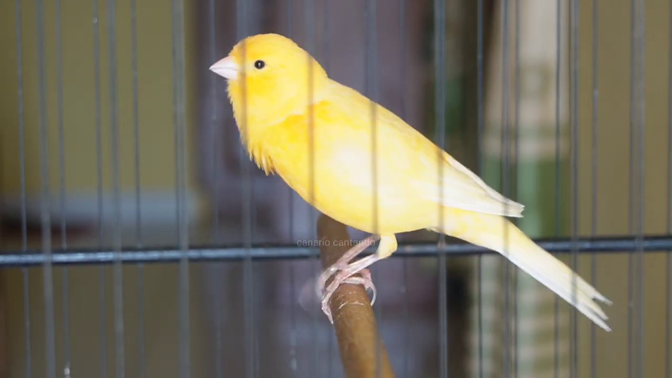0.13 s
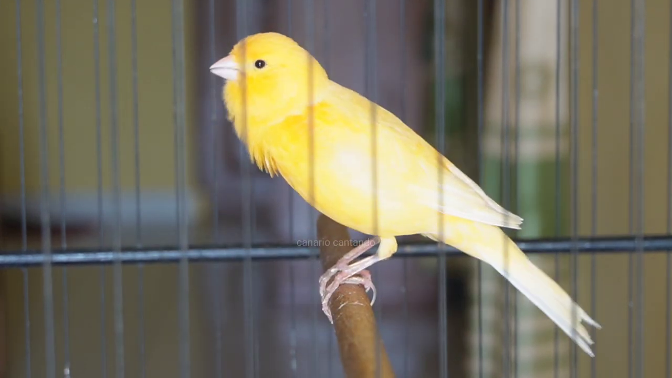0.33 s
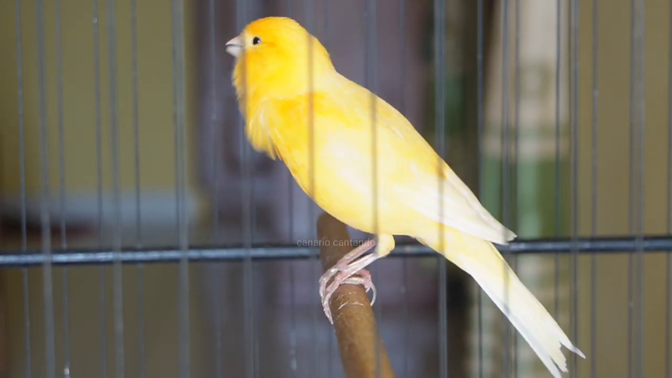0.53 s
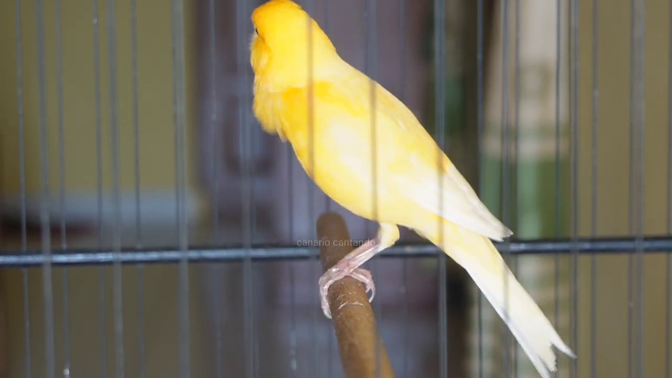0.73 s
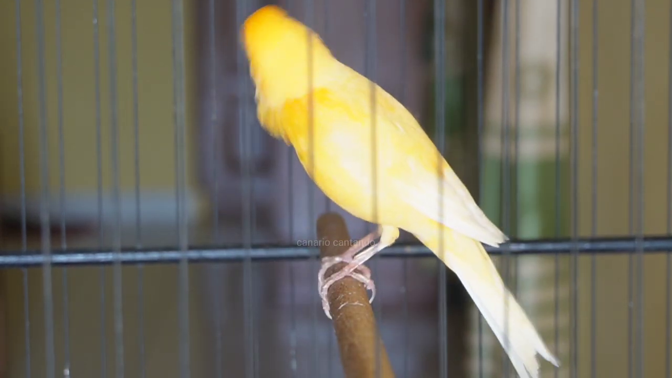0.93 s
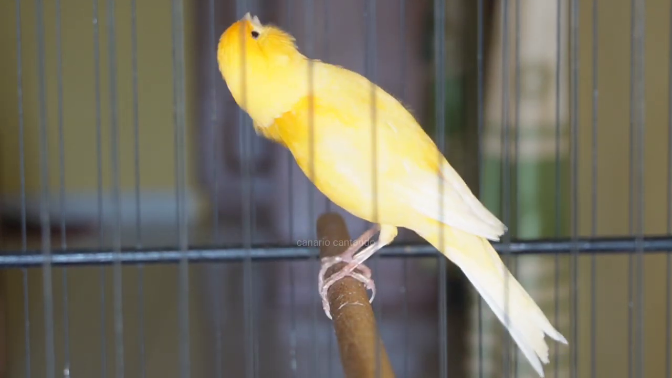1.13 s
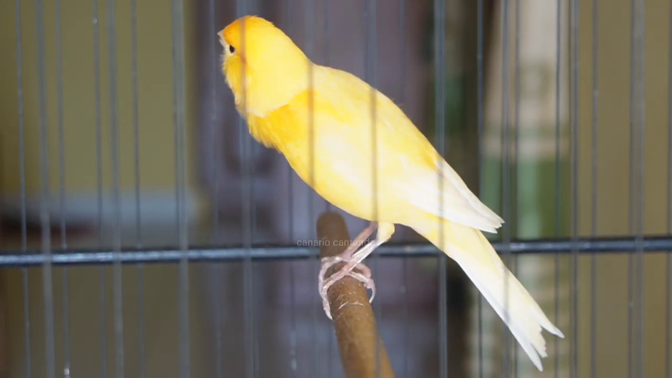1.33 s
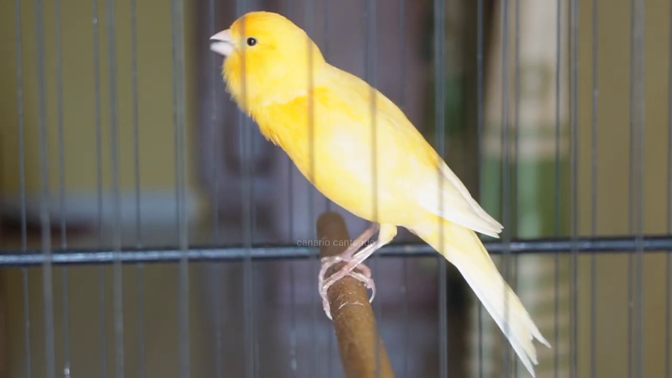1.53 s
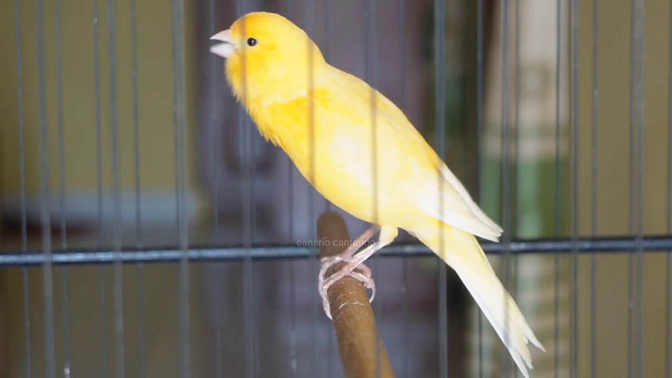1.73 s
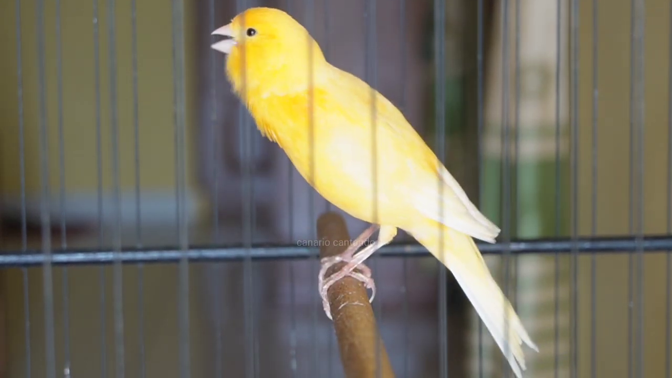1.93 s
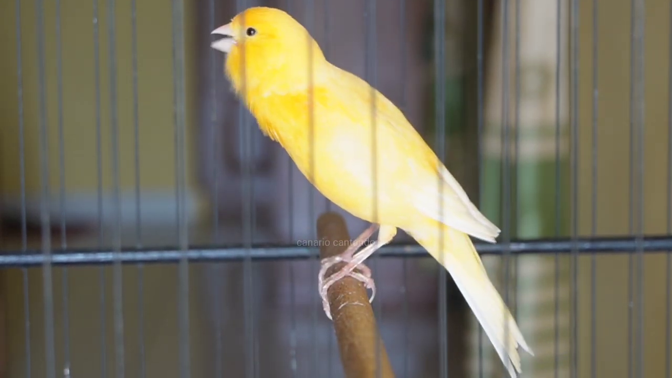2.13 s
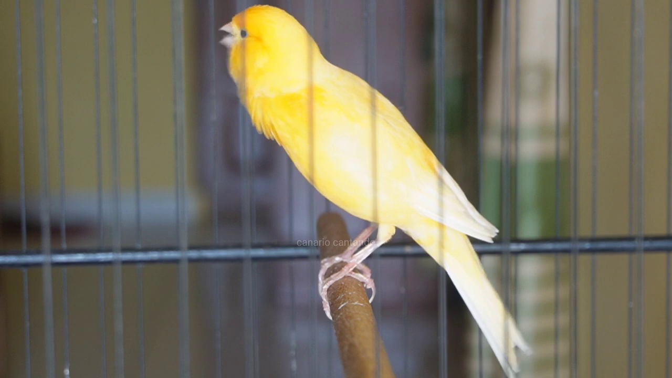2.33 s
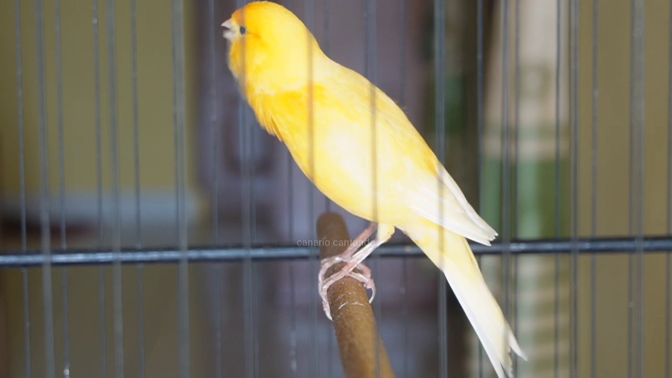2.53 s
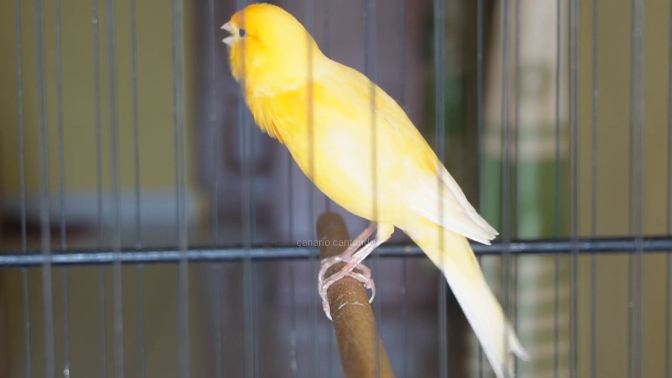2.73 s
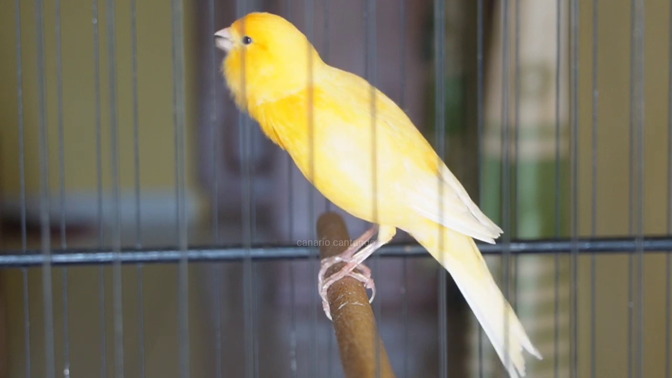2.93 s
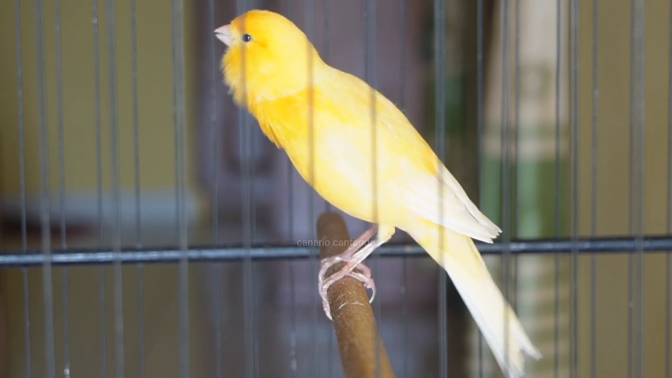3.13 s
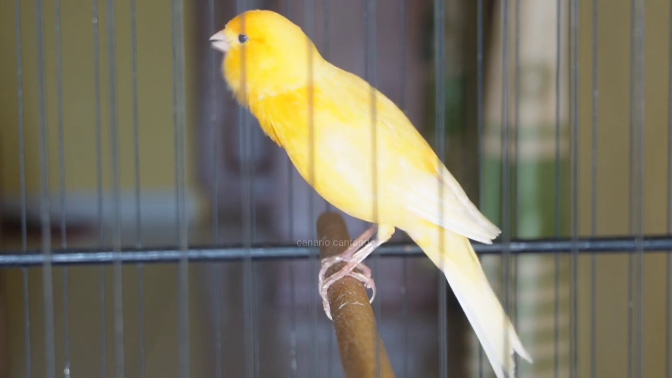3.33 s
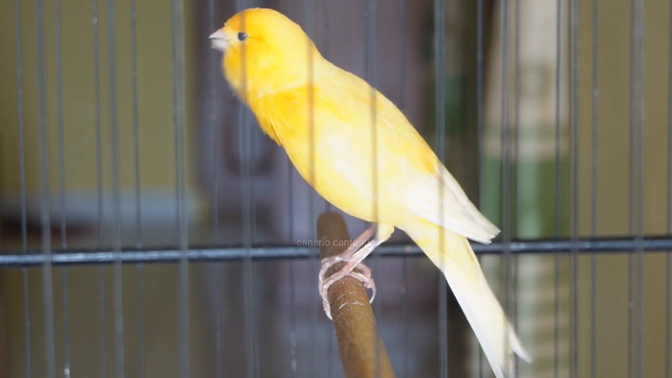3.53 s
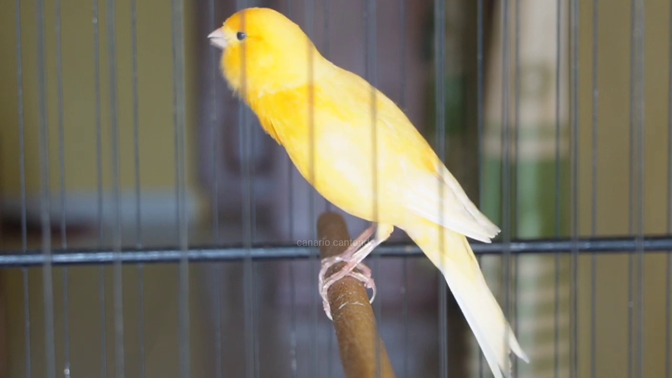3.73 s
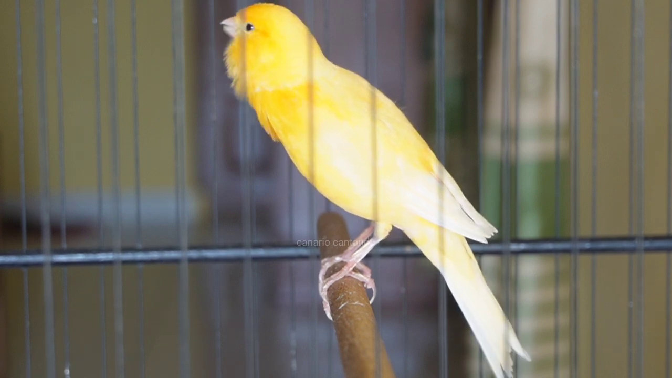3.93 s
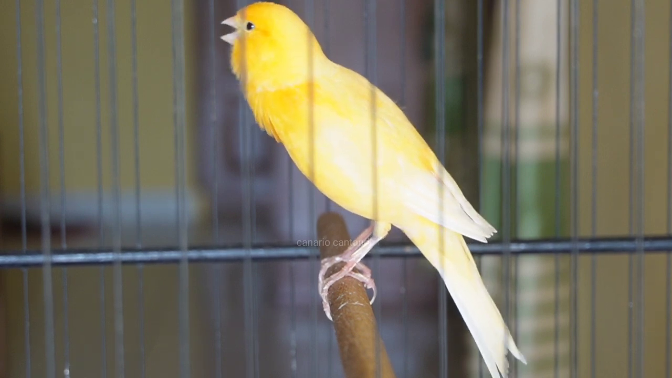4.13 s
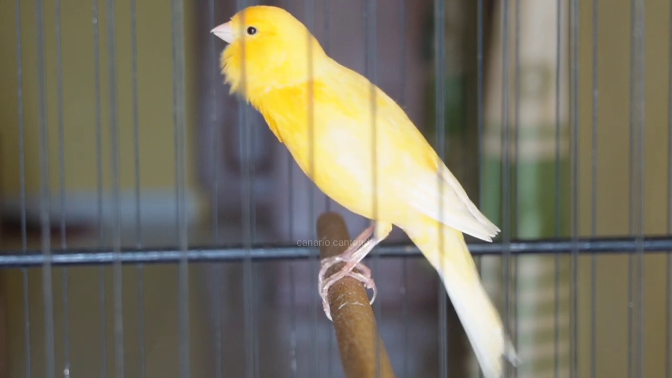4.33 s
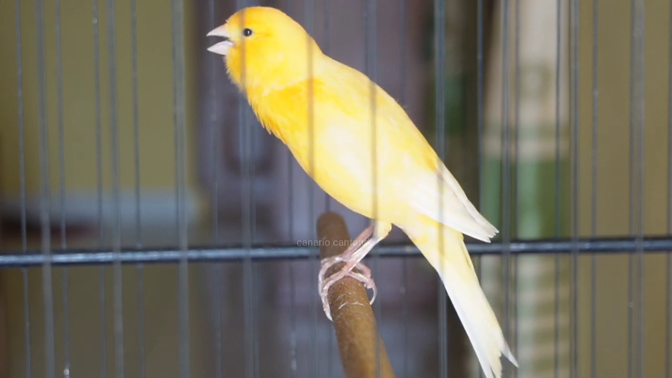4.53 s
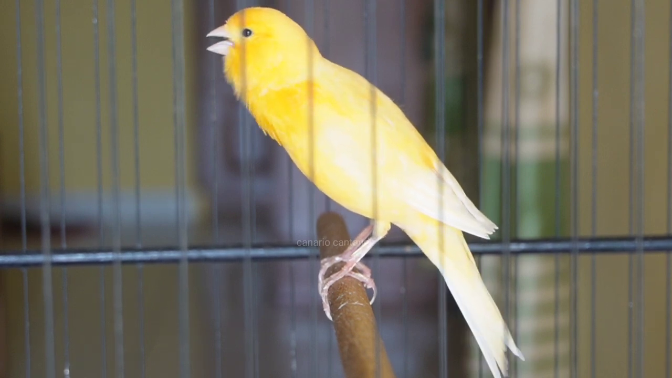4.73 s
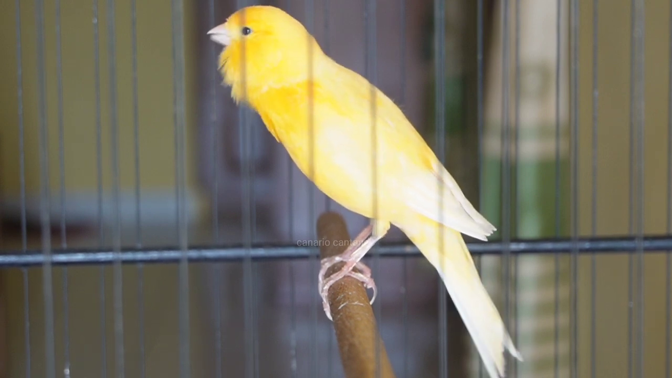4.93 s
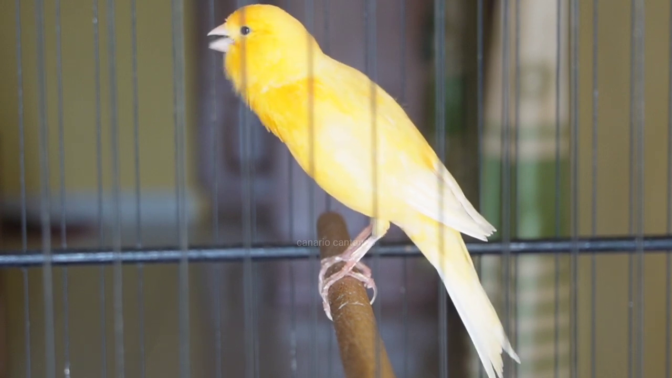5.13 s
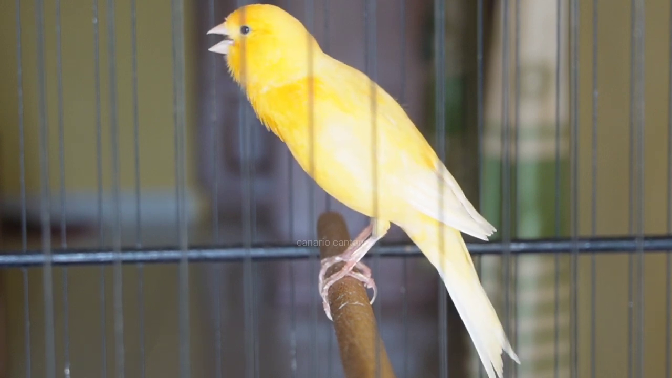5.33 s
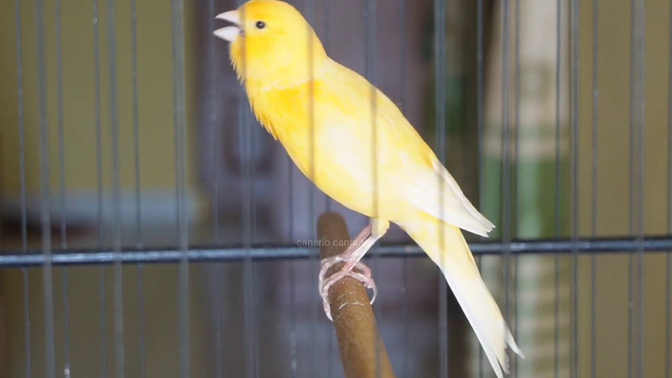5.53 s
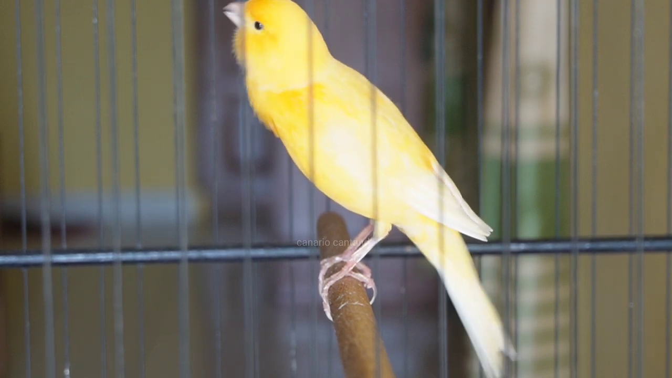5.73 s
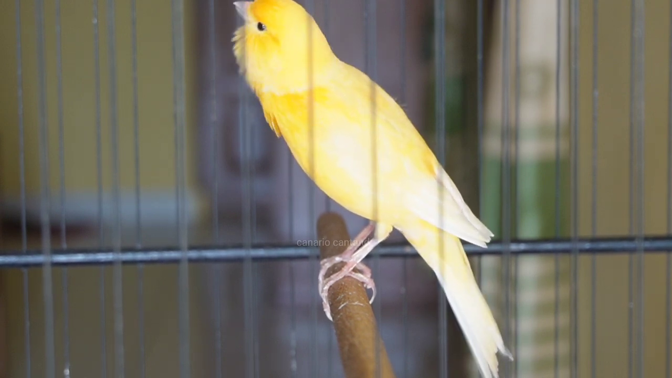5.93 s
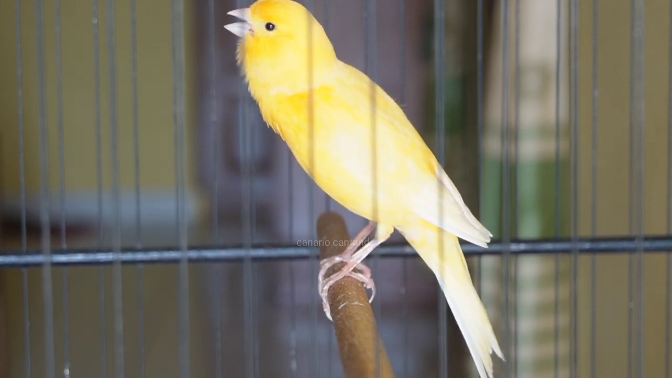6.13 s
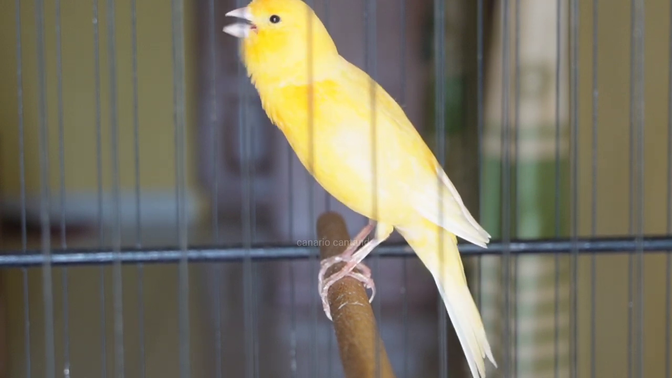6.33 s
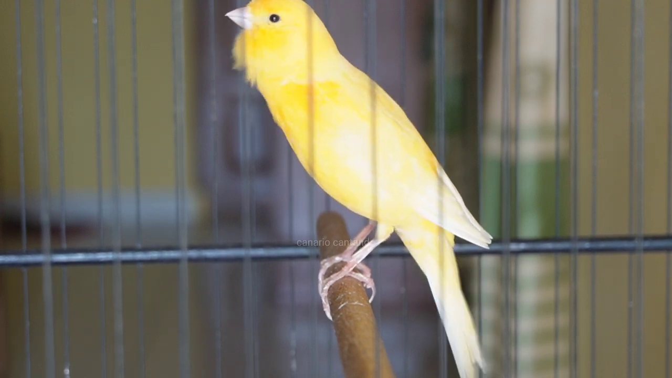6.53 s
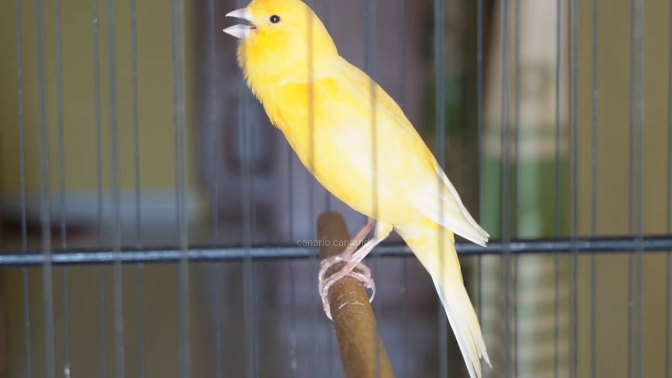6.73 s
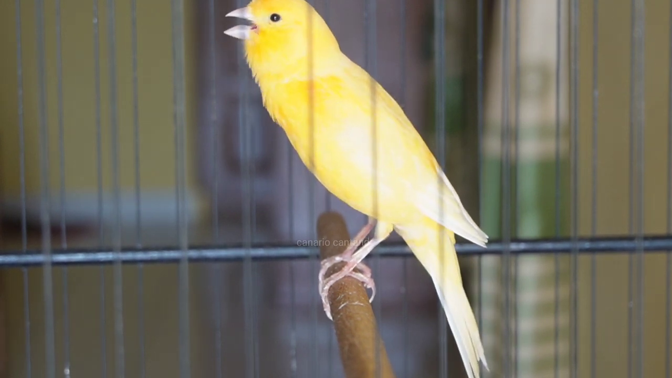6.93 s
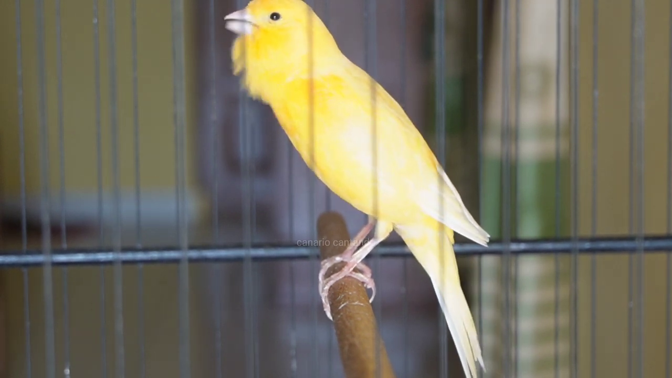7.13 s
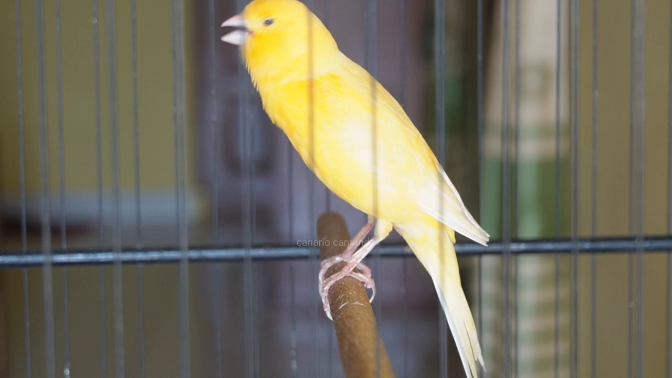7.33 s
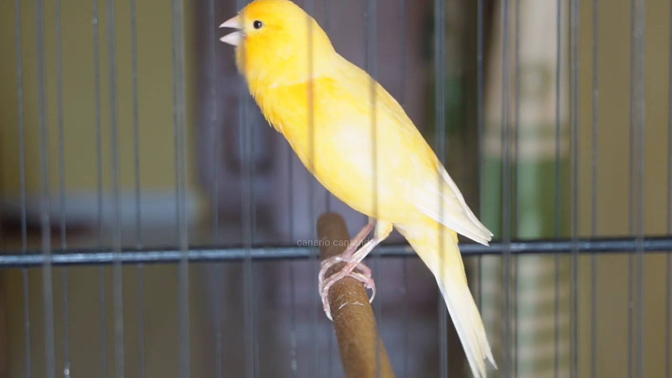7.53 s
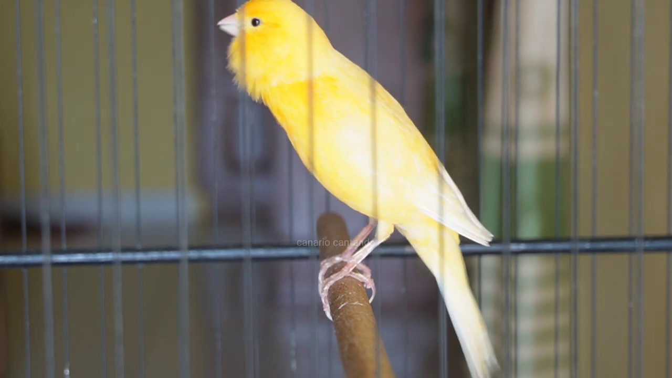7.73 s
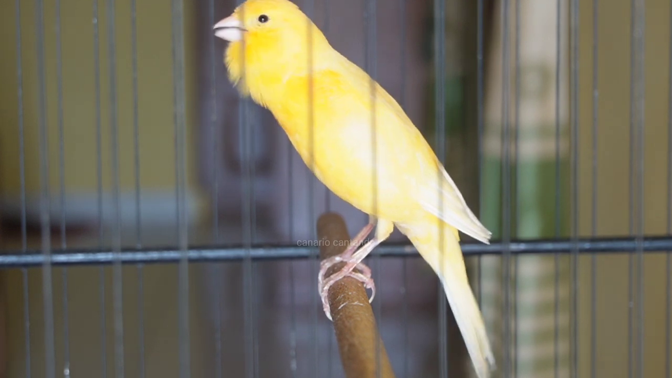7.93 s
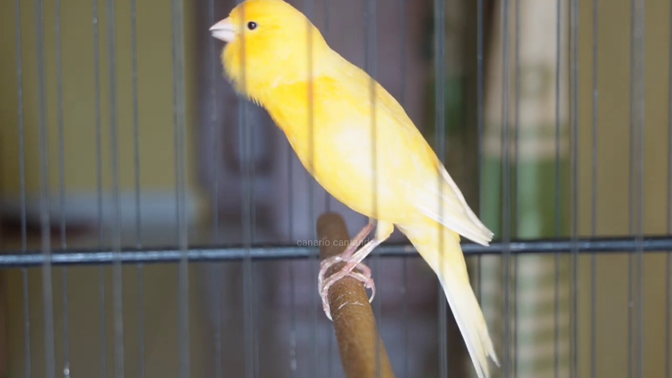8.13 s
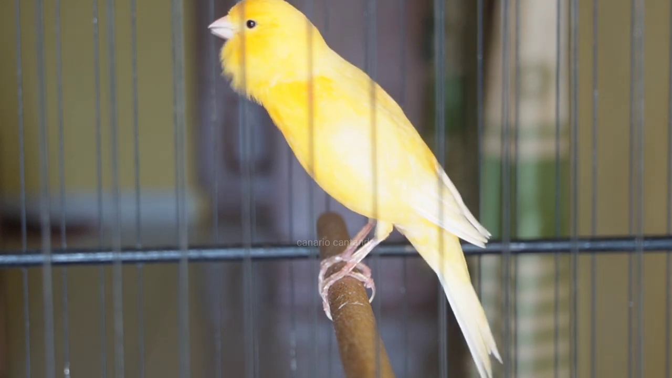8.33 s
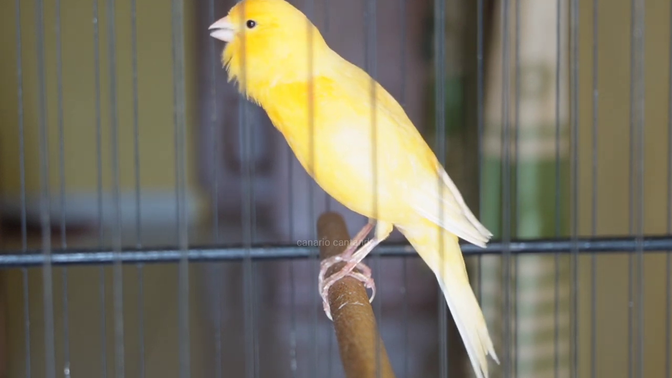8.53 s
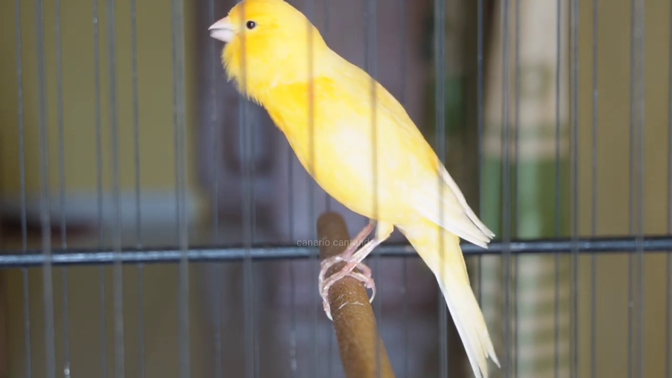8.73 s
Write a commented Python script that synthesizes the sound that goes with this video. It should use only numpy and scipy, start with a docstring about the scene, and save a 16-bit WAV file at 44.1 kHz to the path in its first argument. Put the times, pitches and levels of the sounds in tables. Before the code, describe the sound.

Close canary song of rapid chips, rolls, slowing falling whistles and a final loud trill, over a faint low rumble and hiss.

```python
"""In a small room, a caged canary sings close to the microphone, over a low rumble and thin hiss.
Quick downward sweeps slow into long falling whistles; two rising whistles lead into a fast, loud trill.
Each syllable is a nearly pure tone whose pitch follows membrane tension in the syrinx and whose level
is shaped by throat and beak. Near reflections, a wall echo and a short reverberation follow it.
Early in the song a faint, distant tone swells and fades."""
import sys
import numpy as np
from scipy import signal
from scipy.fft import rfft, irfft
from scipy.io import wavfile
from scipy.ndimage import uniform_filter1d, minimum_filter1d, map_coordinates

SR = 44100
rng = np.random.default_rng(int(sys.argv[2]) if len(sys.argv) > 2 else 0)


def log_audio(samples):
    """Write samples as a 16-bit WAV file to the path given in sys.argv[1]."""
    # one column per channel
    frames = np.atleast_2d(samples).T
    # limit to full scale, then quantise
    limited = np.clip(frames, -1, 1)
    pcm = np.round(limited * 32767).astype(np.int16)
    wavfile.write(sys.argv[1], SR, pcm)


N = 392049
TIME = np.arange(N) / SR

# spectrum of the background noise: (frequency [Hz], relative density [dB])
NOISE_SPECTRUM = [(25, -18), (45, -9), (70, -3), (110, -2), (170, 0), (280, -5), (500, -9), (1000, -11),
                  (2000, -13), (4000, -15.5), (8000, -24.5), (12000, -32), (16000, -35)]
# stereo width of that noise: (frequency [Hz], side minus mid [dB])
NOISE_WIDTH = [(25, -20), (90, -17.5), (180, -11.5), (350, -6.5), (1000, -8), (12000, -1)]
# envelope of that noise: (time [s], level [dB])
NOISE_ENVELOPE = [(0, -50), (4, -49), (7.7, -49), (8.2, -50.5), (8.9, -53)]
# course of the distant tone: (time [s], pitch [Hz], level [dB])
DISTANT_TONE = [(1.7, 983, -72), (1.85, 965, -64), (1.97, 950, -52.5), (2.12, 937, -53), (2.3, 947, -54.5),
                (2.6, 940, -74)]

# spectrum of the reverberation: (frequency [Hz], gain [dB])
REVERB_SPECTRUM = [(2000, -8), (2800, -9.5), (3600, -8), (4500, -5), (5500, -4.5), (6500, -2), (9000, -3),
                   (15000, 1.5)]
# reverberation time: (frequency [Hz], time to fall by 60 dB [s])
REVERB_TIME = [(2000, 0.56), (4000, 0.42), (7000, 0.3), (15000, 0.13)]
# hard surfaces near the perch: (delay [s], gain [dB])
NEAR_REFLECTIONS = [(0.00063, -20), (0.00138, -19), (0.00143, -11), (0.00145, -13), (0.00283, -24),
                    (0.00878, -20), (0.00916, -24)]
# one wall returns mostly the low end of a sweep, as a second pip: (frequency [Hz], gain [dB])
WALL_RESPONSE = [(2000, -17.5), (2700, -10), (3100, -13.5), (3700, -19.5), (6000, -38)]
# where the beak points: (time [s], left minus right [dB])
BEAK_DIRECTION = [(0, -.4), (7.3, -.4), (7.9, -1.3)]

# how well throat and beak radiate the tone: (frequency [Hz], gain [dB])
TRACT_RESPONSE = [(1500, -32), (2100, -16.5), (2800, -1.5), (3500, -0.7), (4300, 0.5), (4900, -4),
                  (5500, -8), (6200, -15), (7000, -14.5), (8000, -31)]
# strength of an overtone against the fundamental: (overtone frequency [Hz], relative level [dB])
OVERTONE_SPECTRUM = [(4000, -41), (6000, -48), (7500, -46.5), (8200, -45.5), (9500, -33.5), (11000, -37),
                     (12500, -47), (15000, -34.5)]
# offset of each harmonic from that spectrum: (multiple of the pitch [1], offset [dB])
HARMONIC_OFFSETS = [(2, 2.5), (3, -8.5), (4, -15)]
# the repertoire, by gesture name: (share of the note [1], pitch [Hz], relative pressure [dB])
SONG_GESTURES = { "pip": [(0, 4600, -2), (.3, 3950, -14), (.6, 3170, -2.5), (.85, 3120, -1.5),
                 (1, 2580, -3)], "tick": [(0, 6330, 6), (.3, 4760, -6.5), (.6, 4120, -12), (.85, 3196, 0.5),
                 (1, 2700, -3)], "chit": [(0, 7150, -4), (.3, 5300, -11), (.6, 4280, -7.5),
                 (.85, 3450, -0.5), (1, 2600, -11)], "chip": [(0, 7350, -4), (.3, 5600, -14),
                 (.6, 4500, -7.5), (.85, 3620, 0.5), (1, 2990, -24)], "roll": [(0, 7010, -3.5),
                 (.3, 5270, -5.5), (.6, 3900, -1), (.85, 2860, 0), (1, 1980, -2)], "sweep": [(0, 7120, -6),
                 (.3, 5760, -0.5), (.6, 4307, 0), (.85, 3040, -2.5), (1, 1996, -8.5)],
                 "dive": [(0, 7150, -12.5), (.3, 5630, -2.5), (.6, 4233, 0), (.85, 2870, -4),
                 (1, 1555, -0.5)], "arch": [(0, 7720, -1), (.3, 6720, -3), (.6, 5420, -0.5),
                 (.85, 3520, -4), (1, 1550, -5.5)], "fall": [(0, 7720, -5.5), (.3, 6300, -3.5),
                 (.6, 4970, -0.5), (.85, 3680, -2.5), (1, 1570, -7)], "rise": [(0, 2630, -16.5),
                 (.05, 3520, -2.5), (.18, 4110, -3), (.34, 5020, -2.5), (.6, 5800, -2), (.9, 6220, 4),
                 (1, 6257, 0)], "flick": [(0, 2410, -8.5), (.27, 2910, -5), (.55, 3530, 3.5),
                 (.74, 3710, 6.5), (.87, 3800, -1), (1, 3800, -18.5)], "chirp": [(0, 1900, -5.5),
                 (.27, 3024, -1.5), (.55, 3550, 2), (.74, 3744, 6.5), (.87, 3830, 0), (1, 3770, -18)]}
# rolls and trills, each repeating one gesture: (gesture, notes [count], first end [s], last end [s],
# time added to each beat [s], first length [s], last length [s], first gain [dB], last gain [dB],
# latest entry as a share of the note [1])
SONG_RUNS = [("tick", 12, .4600, .9392, .00031, .0195, .0195, -22, -18.5, .2),
             ("chit", 5, 1.0316, 1.2156, 0, .022, .024, -16, -11.5, .1),
             ("chip", 11, 1.262, 1.7585, .0005, .025, .0285, -11, -11, .17),
             ("roll", 15, 1.8832, 2.7975, .00012, .039, .0395, -13, -10, .02),
             ("flick", 3, 7.829, 7.918, 0, .027, .025, -12.5, -11.5, 0.017),
             ("chirp", 21, 7.9627, 8.8825, .00013, .028, .029, -9, -8, .02)]
# notes sung singly: (gesture, end [s], length [s], pitch factor [1], gain [dB])
SINGLE_NOTES = [("pip", .3372, .0144, 1, -33.5), ("pip", .38, .0193, 1.08, -29.5),
                ("pip", .42, .0115, 1, -25), ("pip", .9835, .006, .96, -13.5),
                ("chit", 1.817, .0315, .97, -12.5), ("sweep", 2.8813, .0545, 0.93, -10.5),
                ("sweep", 2.9691, .06, 1, -10), ("sweep", 3.0599, .0637, 1, -9),
                ("sweep", 3.1479, .0607, 0.99, -9), ("sweep", 3.2408, .0613, .99, -8),
                ("sweep", 3.3347, .0636, 1, -9), ("sweep", 3.4309, 0.068, 1.01, -7),
                ("sweep", 3.5251, .065, 0.99, -7.5), ("dive", 3.6271, .0698, 1, -6.5),
                ("dive", 3.725, .0682, 0.98, -7.5), ("dive", 3.8265, .0707, 0.99, -8),
                ("dive", 3.9381, .0789, .98, -7.5), ("dive", 4.0508, .0777, 1, -7),
                ("dive", 4.1644, .0772, .98, -7), ("dive", 4.2947, .0953, 0.99, -6),
                ("dive", 4.4393, 0.11, 1.01, -6.5), ("dive", 4.582, .1057, 1.006, -6),
                ("dive", 4.7396, .1128, 1.01, -6.5), ("dive", 4.8944, .1108, 1.02, -7),
                ("dive", 5.0572, 0.113, 0.99, -5.5), ("arch", 5.2878, .1254, 0.88, -5),
                ("arch", 5.5289, 0.18, 1, -4.5), ("arch", 5.7791, 0.2, 1, -4),
                ("arch", 6.0525, 0.21, 1, -5), ("fall", 6.3216, 0.21, 0.98, -5),
                ("fall", 6.6203, 0.24, 1, -4), ("fall", 6.9393, 0.25, 1, -3.5),
                ("fall", 7.2687, 0.26, 1, -4.5), ("rise", 7.522, .176, 1, -7),
                ("rise", 7.757, .186, 1, -5.5)]


def undb(db):
    """Amplitude ratio of a level in decibels: tenfold for every 20 dB."""
    return 10 ** (np.asarray(db) / 20)


def at_frequency(table, hz):
    """Interpolation of a (frequency, value) table on a logarithmic frequency axis."""
    points, values = np.transpose(table)
    return np.interp(np.log(np.maximum(hz, 1)), np.log(points), values)


def unit_rms(x):
    """Normalisation to a mean power of one."""
    return x / np.sqrt(np.mean(x ** 2))


def colour(x, table):
    """Linear filtering: the spectrum is multiplied by a (frequency [Hz], gain [dB]) curve."""
    gain = undb(at_frequency(table, np.fft.rfftfreq(len(x), 1 / SR)))
    return irfft(rfft(x) * gain, len(x))


def wander(size, rate_hz):
    """Smooth random fluctuation with spread near one: a spline through Gaussian values."""
    steps = np.arange(size) * rate_hz / SR
    return map_coordinates(rng.standard_normal(int(steps[-1]) + 2), [steps], order=3, mode="nearest")


def stereo(mid, side):
    """Mid-side stereophony: the sum is the left channel, the difference the right."""
    return np.array([mid + side, mid - side])


def background_noise():
    """Filtered noise gives rumble and hiss; an independent side signal widens it towards the treble."""
    mid, side = (unit_rms(colour(rng.standard_normal(N), NOISE_SPECTRUM)) for _ in range(2))
    envelope = undb(np.interp(TIME, *np.transpose(NOISE_ENVELOPE)))
    return stereo(mid, colour(side, NOISE_WIDTH)) * envelope


def distant_tone(pitch_spread=.035, flicker_db=3):
    """Random modulation of frequency and amplitude blurs a faint tone into a narrow band."""
    times, pitches, levels = np.transpose(DISTANT_TONE)
    hz = np.interp(TIME, times, pitches) * (1 + pitch_spread * wander(N, rate_hz=90))
    swell = np.interp(TIME, times, undb(levels), left=0, right=0)
    flicker = undb(flicker_db * wander(N, rate_hz=30.04))
    return swell * flicker * np.sqrt(2) * np.sin(2 * np.pi * np.cumsum(hz) / SR)


def reverberation(build_up_s=.005):
    """A diffuse field builds up quickly and decays exponentially, sooner in the treble."""
    size = SR // 2
    hz, t, spectrogram = signal.stft(rng.standard_normal(size), SR, nperseg=256)
    decay = np.exp(-np.log(1000) * t / at_frequency(REVERB_TIME, hz)[:, None])
    onset = 1 - np.exp(-(np.arange(size) / SR / build_up_s) ** 2)
    tail = signal.istft(spectrogram * decay, SR)[1][:size] * onset
    return colour(unit_rms(tail) / np.sqrt(size), REVERB_SPECTRUM)


def room(song, wall_delay_s=.00878, reverb_db=-1.2, side_db=-5, ripple_share=.25):
    """Superposition of direct sound and echoes: interference with near reflections ripples each sweep."""
    early, wall = np.zeros((2, SR // 2))
    early[0] = 1  # direct sound
    for delay, db in NEAR_REFLECTIONS:
        early[round(delay * SR)] += undb(db)
    wall[round(wall_delay_s * SR)] = 1
    diffuse = stereo(reverberation(), undb(side_db) * reverberation())
    echoes = colour(wall, WALL_RESPONSE) + undb(reverb_db) * diffuse
    # the near surfaces stand by the bird, so the echoes carry a little of the ripple too
    rippled = signal.fftconvolve(echoes, early[None], axes=1)[:, :len(early)]
    response = early + echoes + ripple_share * (rippled - echoes)
    pan_db = np.interp(TIME, *np.transpose(BEAK_DIRECTION))
    balance = undb(np.array([pan_db, -pan_db]) / 2)
    return signal.fftconvolve(song[None], response, axes=1)[:, :N] * balance


def membrane_pitch(progress, shares, pitches, waver=.0044):
    """Frequency goes as the square root of membrane tension, which the muscles change smoothly."""
    margin = len(progress) // 20
    tension = np.interp(progress, shares, np.square(pitches))
    padded = np.pad(tension, margin, "reflect", reflect_type="odd")
    smooth_tension = uniform_filter1d(padded, 2 * margin)[margin:-margin]
    return np.sqrt(smooth_tension) * (1 + waver * wander(len(progress), rate_hz=180))


def syrinx(length, shares, pitches, levels, attack_s=.0024, release_s=.0025, flutter_db=1):
    """Source and filter: a gliding tone, richer in overtones with effort, radiates by throat and beak."""
    size = int(length * SR)
    t = np.arange(size) / SR
    hz = membrane_pitch(t / length, shares, pitches)
    phase = 2 * np.pi * np.cumsum(hz) / SR
    tone = np.sin(phase)
    effort_db = .4 * (np.mean(levels) + 13)  # overtones gain 0.4 dB per dB above easy song at -13 dB
    for multiple, offset_db in HARMONIC_OFFSETS:
        k = round(multiple)
        strength = undb(offset_db + effort_db + at_frequency(OVERTONE_SPECTRUM, k * hz))
        tone += strength * (k * hz < SR / 2) * np.sin(k * phase)
    opening = np.clip(np.minimum(t / attack_s, (length - t) / release_s), 0, 1)
    valve = np.sin(np.pi / 2 * opening)
    contour_db = np.interp(t / length, shares, levels)
    pressure_db = uniform_filter1d(contour_db, 2 * (size // 20), mode="nearest")
    pressure_db += flutter_db * wander(size, rate_hz=146.5)
    return tone * valve * undb(pressure_db + at_frequency(TRACT_RESPONSE, hz))


def syllable(gesture, length, db, pitch_factor=1, entry=0):
    """Time scaling: a gesture is stretched to the note's length; a late entry skips its start."""
    shares, pitches, levels = np.transpose(SONG_GESTURES[gesture])
    remaining = 1 - entry
    return syrinx(length * remaining, (shares - entry) / remaining, pitch_factor * pitches, db + levels)


def trill(gesture, count, first_s, last_s, slowing_s, first_length, last_length,
          first_db, last_db, latest_entry, scatter_db=.78):
    """Nearly periodic repetition: (end [s], note) pairs whose beat, length and level drift evenly."""
    count = round(count)
    beat = np.arange(count)
    ends = np.linspace(first_s, last_s, count) - slowing_s * beat * beat[::-1] / 2
    lengths = np.linspace(first_length, last_length, count)
    levels = np.linspace(first_db, last_db, count) + scatter_db * rng.standard_normal(count)
    entries = latest_entry * rng.random(count)
    return [(end, syllable(gesture, length, db, entry=entry))
            for end, length, db, entry in zip(ends, lengths, levels, entries)]


def canary():
    """The song is the superposition of single notes and fast runs, each note timed by its end."""
    notes = [(end, syllable(gesture, length, db, pitch_factor))
             for gesture, end, length, pitch_factor, db in SINGLE_NOTES]
    for run in SONG_RUNS:
        notes += trill(*run)
    song = np.zeros(N + SR)
    for end, note in notes:
        stop = int(end * SR)
        song[stop - len(note):stop] += note
    return song[:N]


def scene():
    """Sound pressures add: the bird in its room, the distant tone and the background noise."""
    return room(canary()) + distant_tone() + background_noise()


def record(dry, ceiling=.78, window_samples=300, cutoff_hz=15750):
    """Peak limiting lowers the gain smoothly around peaks over the ceiling; a low-pass cuts the top."""
    allowed_gain = ceiling / np.maximum(np.abs(dry).max(axis=0), ceiling)
    held_gain = minimum_filter1d(allowed_gain, 2 * window_samples)
    gain = uniform_filter1d(uniform_filter1d(held_gain, window_samples), window_samples)
    low_pass = signal.ellip(10, .1, 80, cutoff_hz, fs=SR, output="sos")
    return signal.sosfilt(low_pass, dry * gain)


dry = scene()
out = record(dry)
log_audio(out)
```